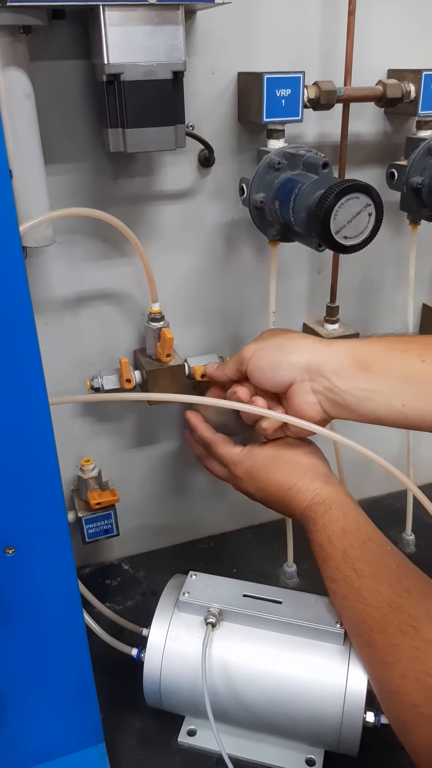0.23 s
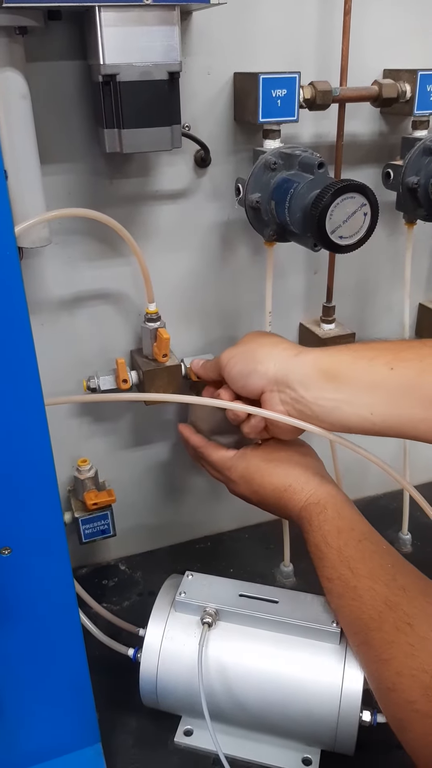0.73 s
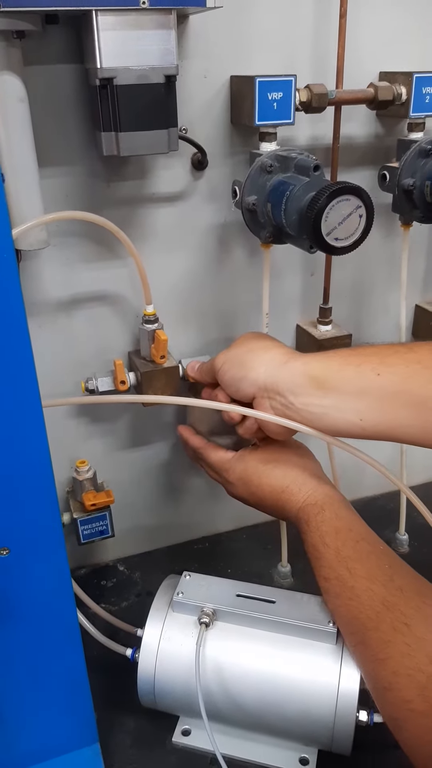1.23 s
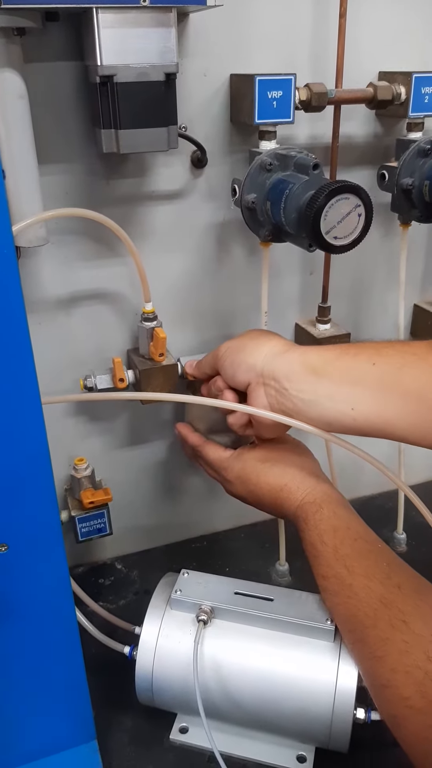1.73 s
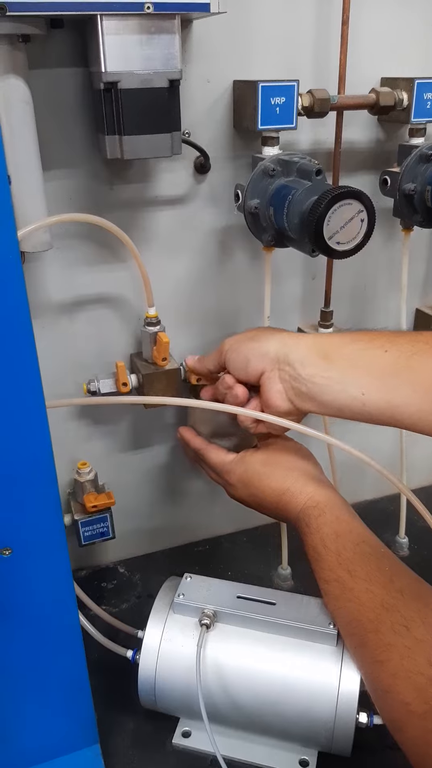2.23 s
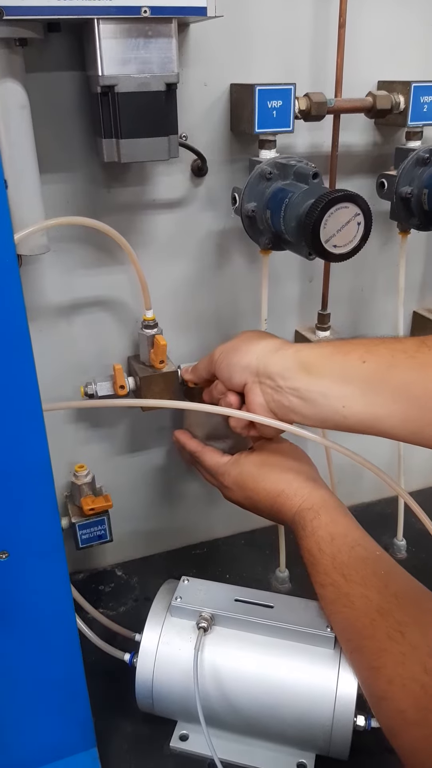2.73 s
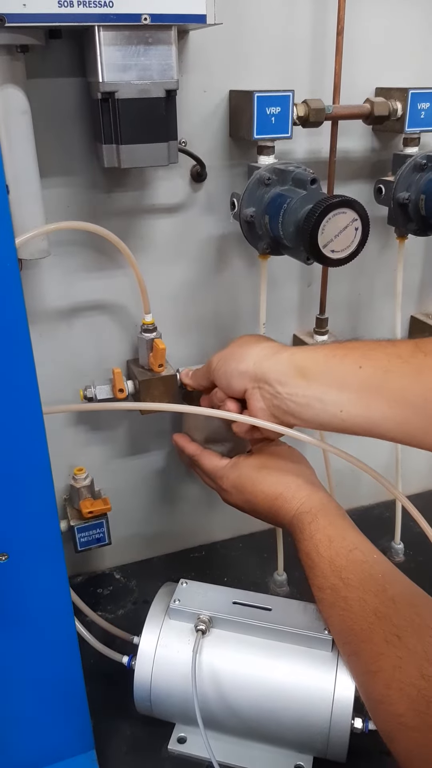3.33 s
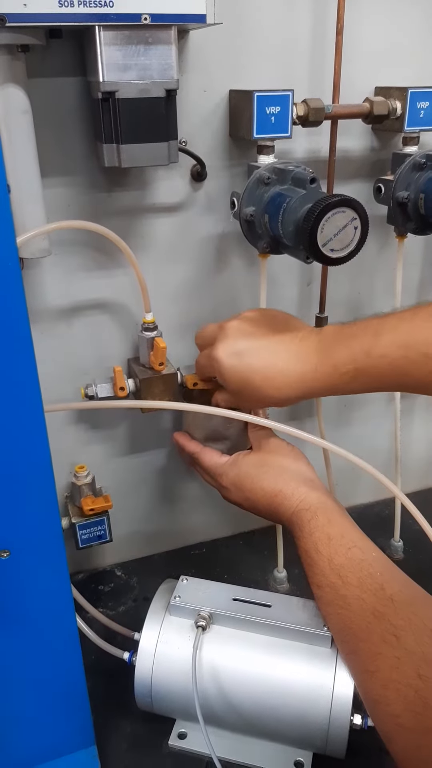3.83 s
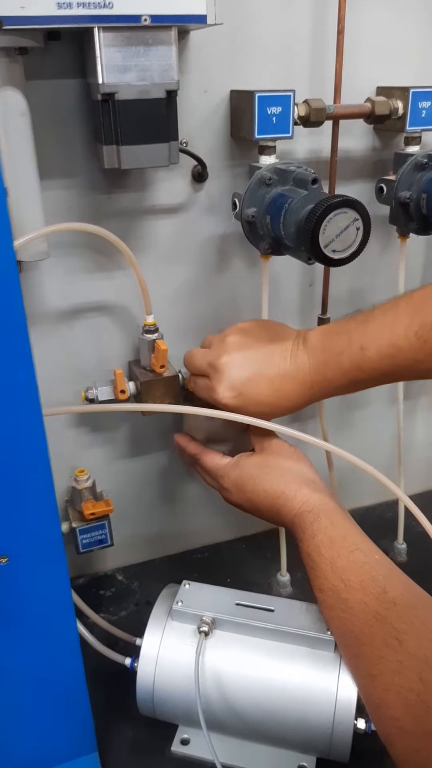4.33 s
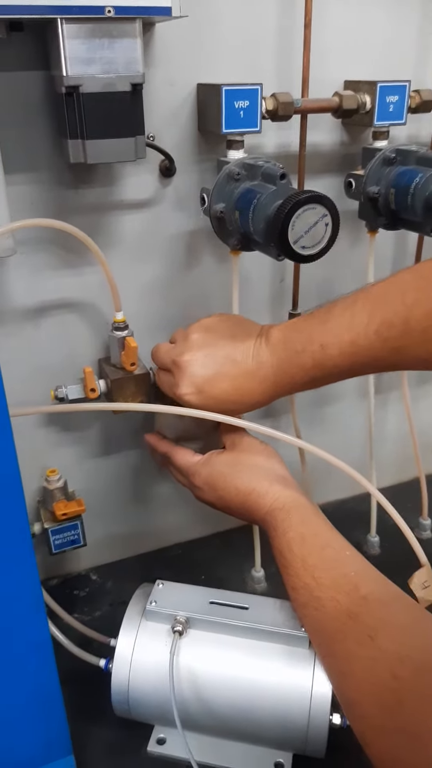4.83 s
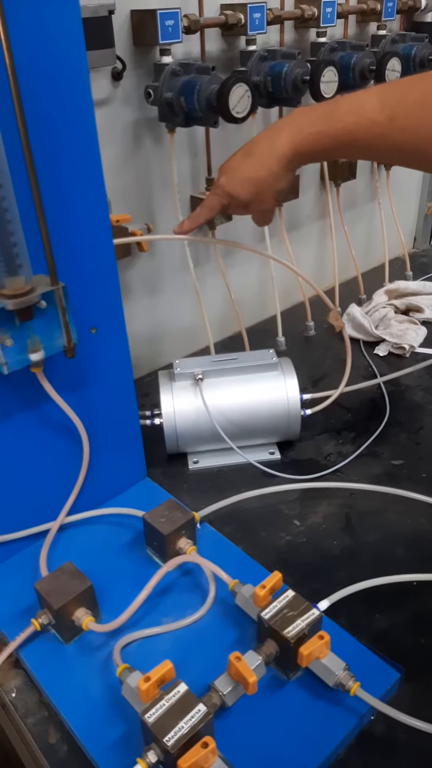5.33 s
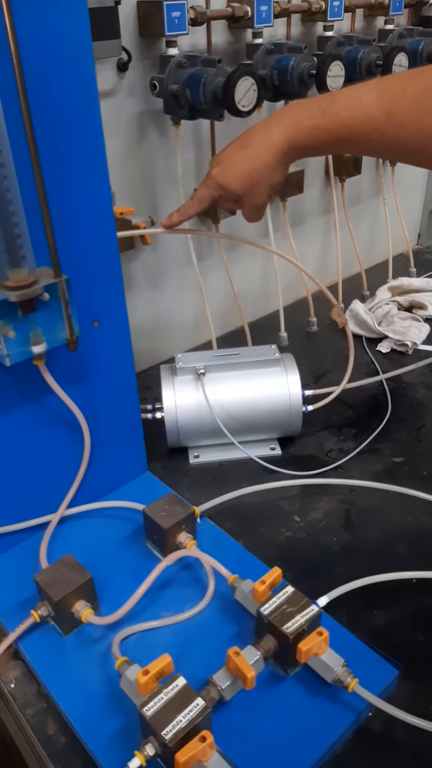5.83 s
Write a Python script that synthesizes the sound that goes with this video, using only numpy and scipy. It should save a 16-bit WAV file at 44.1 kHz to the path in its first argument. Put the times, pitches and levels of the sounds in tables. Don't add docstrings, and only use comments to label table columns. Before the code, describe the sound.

Low fan and pump hum with thin gas hiss and bubbling plops, a burst of clicks, then a changed room tone and brief squeak.

```python
import sys
import numpy as np
from scipy import signal
from scipy.fft import irfft, next_fast_len
from scipy.io import wavfile

SR = 44100
rng = np.random.default_rng(int(sys.argv[2]) if len(sys.argv) > 2 else 0)


def gain_from_db(level_db):
    decades = np.asarray(level_db, float) / 20
    return 10 ** decades


def waveform_to_disk(signal):
    frames = np.transpose(np.atleast_2d(signal))
    scaled = np.clip(frames, -1, 1) * 32767
    samples = np.round(scaled).astype(np.int16)
    wavfile.write(sys.argv[1], SR, samples)


N = 267510
M = next_fast_len(N)
T = np.arange(N) / SR
HZ = np.maximum(np.fft.rfftfreq(M, 1 / SR), 1)
PING_T = np.arange(2048) / SR
JUMP_S = 5.135


def at_hz(points):
    hz, value = np.transpose(points)
    return np.interp(np.log(HZ), np.log(hz), value)


def drift(rate_hz):
    r = np.exp(-80 * np.pi * rate_hz / SR)
    slow = signal.lfilter([1], [1, -2 * r, r * r], rng.standard_normal(N // 40 + 2002))[2000:]
    return np.interp(np.arange(N) / 40, np.arange(len(slow)), slow / slow.std())


def envelope(s, attack_s, hold_s, t60_s):
    rise = np.clip((T - s) / attack_s, 0, 1)
    return rise * gain_from_db(-60 * np.maximum(T - s - attack_s - hold_s, 0) / t60_s)


def ping(hz, t60_s, rise=0.):
    phase = 2 * np.pi * hz * PING_T * (1 + rise * PING_T / t60_s)
    return np.sin(phase) * gain_from_db(-60 * PING_T / t60_s)


def pan(x, left_db):
    return x * gain_from_db(np.array([[left_db / 2], [-left_db / 2]]))


def at_right_port(x, left_db):
    return x * gain_from_db(np.array([[left_db], [0]]))


def add(out, s, sound):
    i = round(s * SR)
    out[:, i:i + sound.shape[1]] += sound


# frequency in Hz, share from 0 to 1.
LIKENESS = [(35, 0.3), (57, 0.26), (78, 0.3), (105, 0.83), (200, 0.95), (330, 0.71), (430, 0.66),
            (520, 0.69), (700, 0.4), (1200, 0.095), (3500, 0.15), (15000, 0.2)]
# frequency in Hz, lead in radians.
PORT_TURN = [(50, 0.93), (80, 1), (115, 0.22), (200, 0.12), (320, -0.51), (450, 0.75), (505, 0.96),
             (600, 0.28), (800, -0.66)]
# delay in seconds, level in dB.
ECHOES = [(.0001, -3), (.0015, -0.5), (.003, -12)]


def port_share():
    paths = sum(gain_from_db(db) * np.exp(-2j * np.pi * HZ * late_s) for late_s, db in ECHOES)
    turn = np.where(HZ < 800, at_hz(PORT_TURN), np.angle(paths))
    return np.clip(at_hz(LIKENESS), 0, 1) * np.exp(1j * turn)


SHARE = port_share()
UNSHARED = np.sqrt(1 - np.abs(SHARE) ** 2)


def stereo_noise(shape):
    real, imag = rng.standard_normal((2, 2, len(HZ))) * np.sqrt(len(HZ))
    left, own = real + 1j * imag
    right = SHARE * left + UNSHARED * own
    return irfft(np.array([left, right]) * shape, M)[:, :N]


def resonant_noise(hz, width_hz):
    x = stereo_noise(1 / (1 + (2 * (HZ - hz) / width_hz) ** 2))
    return x / x.std()


# frequency in Hz, left minus right in dB.
LEFT_LOUDER = [(60, 5), (110, 3), (200, 0.5), (380, -1.5), (700, 2.5), (1290, -1.5), (2380, -1.5),
               (4400, 3.5), (8120, 3), (15000, 0)]


def air(spectrum):
    lean = gain_from_db(at_hz(LEFT_LOUDER) / 2 * np.array([[1], [-1]]))
    return stereo_noise(gain_from_db(at_hz(spectrum)) * lean * np.sqrt(SR / 2))


# frequency in Hz, density in dB per Hz.
RUMBLE_NEAR = [(30, -93), (46, -77), (66, -74), (95, -69.5), (140, -68), (200, -68.5), (290, -69),
               (410, -79), (650, -81), (850, -79.5), (1000, -84.5), (1700, -89), (2500, -96.5),
               (3300, -104)]
RUMBLE_FAR = [(30, -118), (48, -87), (66, -91), (95, -66), (140, -70), (200, -70.5), (290, -71.5),
              (410, -76.5), (650, -81), (850, -80.5), (1000, -83), (1700, -90.5), (2500, -99), (3300, -104)]


def rumble(far):
    near_air = air(RUMBLE_NEAR) * gain_from_db(0.88 * drift(4.1))
    far_air = air(RUMBLE_FAR) * gain_from_db(0.8 * drift(3))
    return np.where(far, far_air, near_air)


# frequency in Hz, density in dB per Hz.
JET_NEAR = [(2500, -110), (3600, -98), (4500, -99), (5200, -103), (6500, -102), (7500, -100.5),
            (8500, -100), (8800, -102), (9200, -93.5), (10400, -98.5), (10650, -89), (12000, -88.5),
            (13200, -86), (15500, -85)]
JET_FAR = [(2500, -106), (3200, -103), (4000, -98.5), (5500, -99.5), (8300, -99.5), (8800, -100),
           (9300, -100), (10800, -93.5), (12200, -89), (13200, -83.5), (14200, -88), (15500, -88)]


def jet(far):
    near_jet = air(JET_NEAR) * gain_from_db(0.73 * drift(0.84))
    far_jet = air(JET_FAR) * gain_from_db(0.4 * drift(3))
    return np.where(far, far_jet, near_jet)


# frequency in Hz, width in Hz, near
# level in dB, far level in dB, left minus right in dB.
RESONANCES = [(505, 55.5, -49, -59.5, 7), (98.9, 6, -51.5, -65, 7), (163.2, 4.7, -56, -55, 9.5),
              (186.8, 2, -65, -55, 12), (4116, 410, -63.5, -66.5, -4), (5908, 57, -74.5, -88, -3),
              (8295, 220, -61, -74, -1), (7850, 380, -69, -68, -6.5), (12870, 260, -64, -76, 17),
              (15000, 480, -65, -80, 6)]
OPEN_S, OPEN_TURN_S, OPEN_DB, OPEN_TOP_SHARE = 4.42, .1, 3.5, 0.49


def resonances(far):
    opening_db = OPEN_DB * np.clip((T - OPEN_S) / OPEN_TURN_S, 0, 1)
    out = 0
    for hz, width_hz, near_db, far_db, left_db in RESONANCES:
        lift = (4000 < hz < 9000) * (1 + OPEN_TOP_SHARE * (hz > 8100))
        near = gain_from_db(near_db + opening_db * lift + .5 * drift(2.9))
        out = out + pan(resonant_noise(hz, width_hz), left_db) * np.where(far, gain_from_db(far_db), near)
    return out


# frequency in Hz, rms level in dB.
HUM = [(57.6, -55.5), (115.5, -60.5), (119.6, -47), (258.4, -58.5), (360.7, -58.5)]


def hum():
    lead = np.array([[0], [.75]])
    out = 0
    for hz, db in HUM:
        level = np.sqrt(2) * gain_from_db(db + 2.0 * drift(0.27))
        out = out + pan(level * np.sin(2 * np.pi * hz * T + lead + .5 * drift(1.63)), 2.9)
    return out


# start in seconds, length in seconds, rms level in dB.
WHISTLES = [(0, 0.25, -58), (.45, 0.27, -61), (.8, .2, -56), (1.9, .15, -64), (3.905, .15, -55.5),
            (4.36, .04, -59), (4.547, 0.18, -59), (4.904, .23, -61)]
WHISTLE_HZ, WHISTLE_CLIMB_HZ_PER_S = 10905, 18
WHISTLE_ATTACK_S, WHISTLE_T60_S, WHISTLE_REST_DB = .03, 7 * 0.047, -78


def whistle(far):
    level = gain_from_db(WHISTLE_REST_DB)
    for s, length_s, db in WHISTLES:
        level = level + gain_from_db(db) * envelope(s - WHISTLE_ATTACK_S, WHISTLE_ATTACK_S, length_s, WHISTLE_T60_S)
    hz = WHISTLE_HZ + WHISTLE_CLIMB_HZ_PER_S * T + 22 * drift(66)
    phase = 2 * np.pi * np.cumsum(hz) / SR
    return np.sqrt(2) * level * gain_from_db(3.5 * drift(30)) * ~far * np.array([np.sin(phase), np.cos(phase)])


# frequency in Hz, width in Hz, rms level in dB.
SWELLS = [(1125, 50, -55), (275, 30, -45.5), (5100, 63, -60.5), (700, 320, -49), (1390, 140, -42.5)]
# start in seconds, length in seconds.
SWELL_TIMES = [(.14, .36), (.45, .2), (-.1, .55), (5.13, .32), (4.398, .02)]


def swells():
    out = 0
    for (hz, width_hz, db), (s, length_s) in zip(SWELLS, SWELL_TIMES):
        swell = np.sin(np.pi * np.clip((T - s) / length_s, 0, 1) ** .5)
        out = out + gain_from_db(db) * resonant_noise(hz, width_hz) * swell
    return out


# start in seconds, peak level in dB, frequency in Hz.
PLOPS = [(0.262, -39.5, 1480), (0.384, -40.5, 1390), (0.797, -45.5, 1370), (0.8183, -42, 1300),
         (0.89, -42.5, 1780), (0.9426, -42.5, 1220), (0.976, -42.5, 1370), (1.1243, -44, 1220),
         (1.475, -37.5, 1350), (1.6118, -45.5, 1880), (1.698, -40.5, 1860), (1.7605, -35, 1946),
         (1.7913, -38, 1460), (1.8841, -41, 1260), (1.984, -45, 1450), (2.2229, -38.5, 1450),
         (2.2756, -42.5, 1700), (2.7768, -43.5, 1350), (2.9153, -45.5, 1200), (2.9635, -39.5, 1245),
         (3.0979, -47, 1300), (3.273, -46, 1340), (3.3984, -39, 1310), (3.4796, -34.5, 1290),
         (3.8088, -40, 1440), (4.044, -40.5, 1550), (5.0618, -48, 1040), (5.3236, -43.5, 1680)]
# start in seconds, peak level in dB.
SURGES = [(0.2922, -39), (1.7605, -39), (2.2757, -45), (3.4782, -47.5), (5.1362, -40.5)]
SPLASH_DB, TUBE_LEFT_DB, TUBE_SPREAD_DB = -9, -6, -0.5


def plops():
    out = np.zeros((2, N))
    soft = 1 - np.exp(-PING_T / 0.00068)
    band = signal.butter(2, [1100, 2300], "band", fs=SR, output="sos")
    splashes = signal.sosfilt(band, rng.standard_normal((len(PLOPS + SURGES), 2, 2048)))
    splashes = splashes * 1.42 * gain_from_db(-60 * PING_T / 0.14)
    places_db = TUBE_LEFT_DB + TUBE_SPREAD_DB * rng.standard_normal(len(PLOPS))
    for (s, db, hz), splash, left_db in zip(PLOPS, splashes, places_db):
        bubble = ping(hz, 45 / hz, rise=0.053) + gain_from_db(SPLASH_DB) * splash
        add(out, s, pan(gain_from_db(db) * soft * bubble, left_db))
    for (s, db), splash in zip(SURGES, splashes[len(PLOPS):]):
        add(out, s, pan(gain_from_db(db) * soft * splash, TUBE_LEFT_DB))
    return out


# frequency in Hz, Q, gain in dB.
COVERED = [(1300, 4.8, 0), (2000, 2.01, 13), (2400, 3.3, -13), (6100, 0.77, -1.5), (7775, 32, 10.5),
           (8360, 18.6, -12)]


def covered_port(x):
    for hz, q, db in COVERED:
        a, w = gain_from_db(db / 2), 2 * np.pi * hz / SR
        k = np.sin(w) / (2 * q)
        top = [1 + k * a, -2 * np.cos(w), 1 - k * a]
        bottom = [1 + k / a, -2 * np.cos(w), 1 - k / a]
        x = signal.lfilter(top, bottom, x)
    return x


# start in seconds, peak level in dB, ring in Hz, snap level in dB, left share in dB.
TICKS = [(0.2934, -39, 1700, -29, 2), (.462, -47, 2100, -58, 1), (1.137, -32.5, 7800, -37, -12),
         (4.3598, -20.5, 1760, -18, -28), (4.3648, -21, 2000, -35, -34), (4.3828, -15, 2120, -8.5, -40),
         (4.3921, -18.5, 1890, -25, -33), (4.446, -26, 2120, -28, -28), (4.4947, -29.5, 3870, -19.5, -27),
         (4.5645, -54, 3850, -26.5, -18)]
CRACK_S, CRACK_DB = 4.3829, -16
SUCTION_S, SUCTION_DB, SUCTION_HZ = 4.3762, -17, 520
SNAP_TOP_HZ = 6500


def finger():
    out = np.zeros((2, N))
    snaps = rng.standard_normal((len(TICKS), 2048)) * gain_from_db(-60 * PING_T / 0.0049)
    snaps = signal.sosfilt(signal.butter(2, SNAP_TOP_HZ, fs=SR, output="sos"), snaps)
    for (s, db, hz, snap_db, left_db), snap in zip(TICKS, snaps):
        bright_snap = signal.lfilter([.4, -.4], [1, -1.3, .45], snap)
        add(out, s, at_right_port(gain_from_db(db) * ping(hz, 0.0081) + gain_from_db(snap_db) * bright_snap, left_db))
    crack = np.diff(rng.standard_normal(130), n=2) / 2 * gain_from_db(-60 * PING_T[:128] / .003)
    add(out, CRACK_S, at_right_port(gain_from_db(CRACK_DB) * crack, -30))
    add(out, SUCTION_S, at_right_port(-gain_from_db(SUCTION_DB) * ping(SUCTION_HZ, .012), -25))
    return out


SQUEAK_S, SQUEAK_DB, SCUFF_DB = 5.572, -44, -52
SQUEAK_ATTACK_S, SQUEAK_HOLD_S, SQUEAK_T60_S, SCUFF_T60_S = .006, .025, .45, .7
SQUEAK_START_HZ, SQUEAK_END_HZ, SQUEAK_SAG_S = 2040, 1890, 0.048


def sole():
    sag = np.exp(-np.maximum(T - SQUEAK_S, 0) / SQUEAK_SAG_S)
    hz = SQUEAK_END_HZ + (SQUEAK_START_HZ - SQUEAK_END_HZ) * sag
    swing = resonant_noise(0, 200) + 1j * resonant_noise(0, 220)
    tone = gain_from_db(SQUEAK_DB) * np.real(swing * np.exp(2j * np.pi * np.cumsum(hz) / SR))
    scuff = gain_from_db(SCUFF_DB) * resonant_noise(3600, 6200)
    tone = tone * envelope(SQUEAK_S, SQUEAK_ATTACK_S, SQUEAK_HOLD_S, SQUEAK_T60_S)
    return tone + scuff * envelope(SQUEAK_S, SQUEAK_ATTACK_S, SQUEAK_HOLD_S, SCUFF_T60_S)


UNCOVER_S, UNCOVER_LENGTH_S = 4.49, 0.22


def scene():
    far = T > JUMP_S
    room = rumble(far) + jet(far) + resonances(far) + hum() + whistle(far) + swells() + plops() + sole()
    free = np.clip((T - UNCOVER_S) / UNCOVER_LENGTH_S, 0, 1)
    room[1] = free * room[1] + (1 - free) * covered_port(room[1])
    return room + finger()


# frequency in Hz, threshold in dB.
GATE = [(2300, -70), (3400, -69.5), (3750, -75), (4500, -75), (4800, -70), (6800, -70), (7600, -73),
        (8600, -71), (9000, -70), (11000, -73)]
GATE_SPREAD_DB, CUTOFF_HZ = 1.3, 15800


def mute_faint_treble(x):
    hz, s, z = signal.stft(x, SR, "cosine", 2048, 1024)
    edges_hz = np.geomspace(2300, 11000, 34)
    band = np.searchsorted(edges_hz, hz)
    for k in range(1, 34):
        power = np.mean(np.abs(z[:, band == k]) ** 2, axis=1).sum(axis=0)
        level_db = 10 * np.log10(30 * power + 1e-18)
        gate_db = np.interp(edges_hz[k], *np.transpose(GATE)) + GATE_SPREAD_DB * rng.standard_normal(len(s))
        z[:, band == k] *= level_db > gate_db
    z[:, hz > CUTOFF_HZ] = 0
    return signal.istft(z, SR, "cosine", 2048, 1024)[1][:, :N]


def low_pass(x):
    return signal.sosfilt(signal.butter(12, 16840, fs=SR, output="sos"), x)


def record(dry):
    mix = mute_faint_treble(dry)
    return low_pass(mix)


dry = scene()
out = record(dry)
waveform_to_disk(out)
```